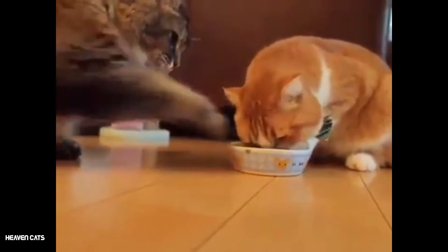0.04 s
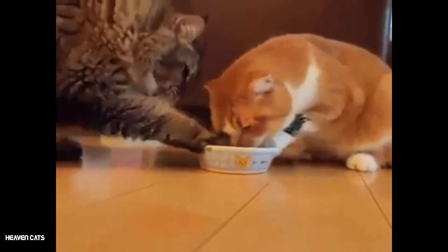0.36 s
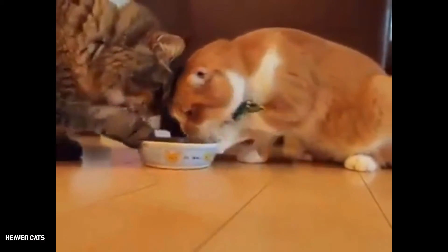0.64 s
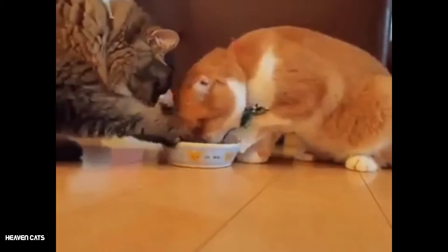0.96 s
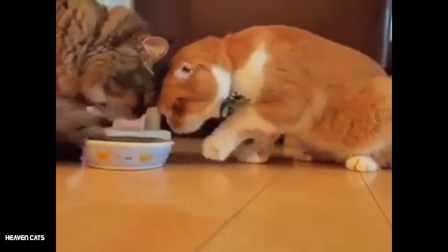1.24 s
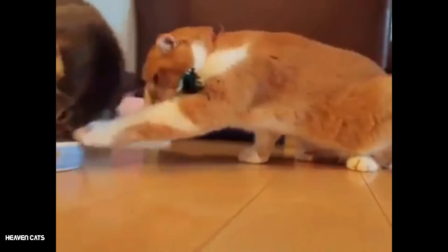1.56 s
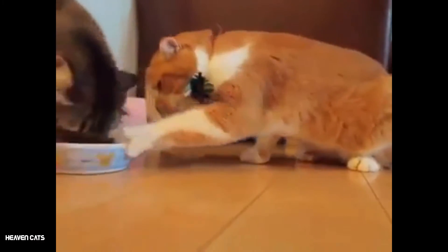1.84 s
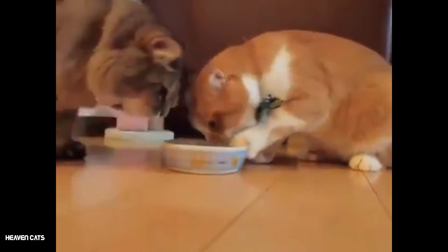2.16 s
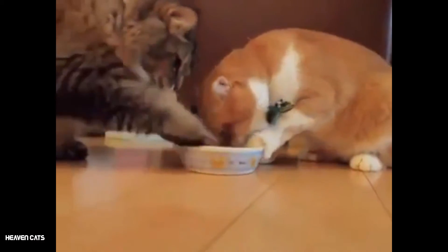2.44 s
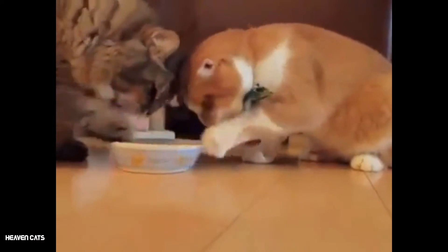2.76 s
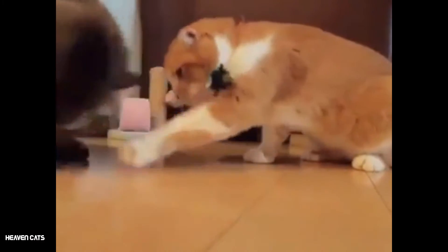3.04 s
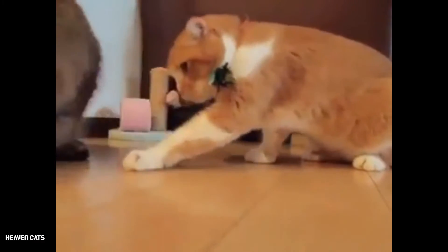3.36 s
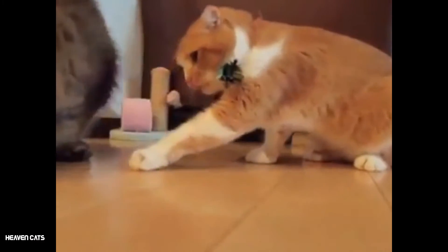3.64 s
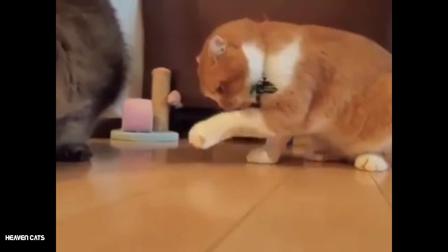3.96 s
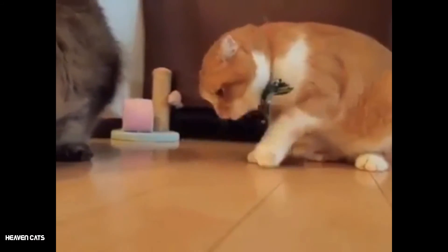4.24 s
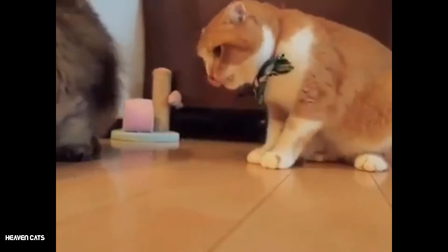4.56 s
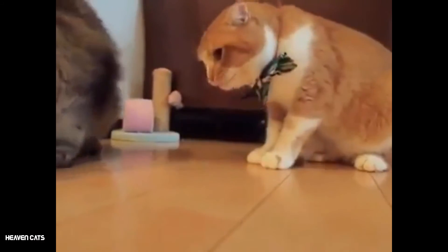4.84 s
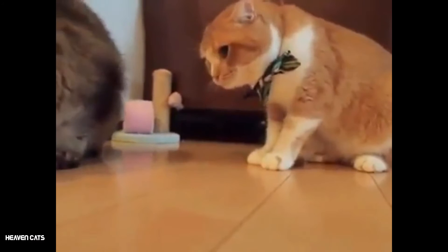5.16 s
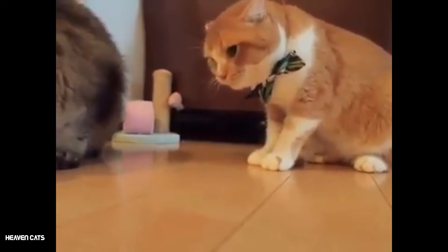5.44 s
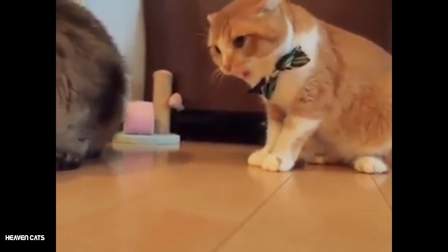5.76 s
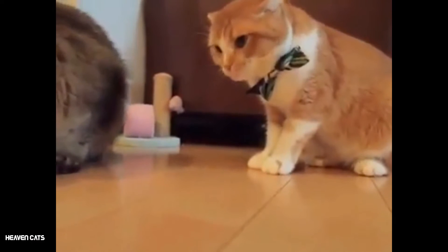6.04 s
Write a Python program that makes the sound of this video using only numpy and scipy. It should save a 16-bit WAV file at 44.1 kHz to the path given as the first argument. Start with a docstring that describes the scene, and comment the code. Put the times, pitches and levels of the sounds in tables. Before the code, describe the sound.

Cats shove a food bowl across a wooden floor with rasping, squeaky scrapes, then faint chewing and a soft double thump.

```python
"""Two cats and a food bowl

Two cats shove a bowl back and forth over a wooden floor, close by in a small room. The rim sticks
and slips: it rumbles the bowl and the boards, rasps on grit, judders, squeals and knocks. Then the
bowl rests; faint ticks of eating and a soft double thump on the floor sound over the room's hush."""
import sys
import numpy as np
from scipy import signal
from scipy.fft import rfft, irfft, next_fast_len
from scipy.io import wavfile
from scipy.ndimage import uniform_filter1d

SR = 44100
rng = np.random.default_rng(int(sys.argv[2]) if len(sys.argv) > 2 else 0)


def inscribe(sig):
    """Save sig as 16-bit PCM at rate SR to the path in sys.argv[1].

    A 1-D sig is mono; a 2-D sig holds one channel per row.
    Samples are clipped to [-1, 1] before scaling.
    """
    pcm = np.round(np.clip(np.atleast_2d(sig).T, -1, 1) * 32767)
    wavfile.write(sys.argv[1], SR, pcm.astype(np.int16))


N = 268569
T = np.arange(N) / SR

# modes of the floor and of the bowl, low to high: (frequency [Hz], width [Hz], gain [dB])
BOARD_MODES = [(92, 16, 0), (128, 34, -5), (174, 26, 3), (220, 30, -5)]
BOWL_MODES = [(280, 65, -2.5), (385, 65, 0), (480, 100, -8.5)]
RIM_MODES = [(570, 90, -2.5), (680, 90, 0), (835, 55, -7), (1060, 200, -16)]
GLAZE_MODES = [(1205, 40, -1), (1425, 45, -1), (1690, 60, 0), (1900, 90, -6), (2190, 60, 0), (2490, 60, -2),
               (2850, 75, 0), (3140, 70, -1), (3680, 110, -4), (4020, 160, -9), (4850, 260, -10)]
# grit under the rim: (frequency [Hz], gain [dB])
RASP_SPECTRUM = [(470, -8), (800, -5), (1140, -4), (1220, 0), (1510, -4.5), (1750, 0), (1940, -4.5),
                 (3080, -9), (7050, -19.5), (8350, -30), (12000, -32.5), (15600, -90), (22000, -120)]
# paw shoves: (start [s], fastest [s], end [s], rasp [dB], rumble [dB], rim chatter [dB])
SHOVES = [(.2, .35, .47, -29.5, -26, -26.5), (.198, .21, .31, -46, -39, -36),
          (0.333, 0.479, 0.55, -28, -14, -25), (0.414, .53, 0.71, -31.5, -24, -31),
          (0.673, 0.847, .925, -33.5, -21, -35), (0.944, 1.02, 1.21, -34, -21.5, -31.5),
          (1.028, 1.22, 1.438, -25.5, -18.5, -27.5), (1.275, 1.402, 1.583, -35.5, -20, -33),
          (1.683, 1.994, 2.183, -26.5, -20, -24), (2.06, 2.19, 2.33, -33, -22, -32),
          (2.24, 2.3, 2.43, -48, -34, -46), (2.505, 2.724, 2.87, -28.5, -20, -30),
          (2.686, 2.895, 3.078, -25.5, -17, -25), (2.92, 3.08, 3.255, -35.5, -24.5, -28),
          (3.13, 3.2, 3.32, -49, -35, -42)]
# friction locked onto one low mode: (start [s], end [s], frequency [Hz], level [dB])
GROANS = [(.203, .28, 745, -34), (.388, .445, 385, -14.5), (1.225, 1.265, 440, -19),
          (1.385, 1.49, 390, -17), (1.49, 1.565, 390, -28), (1.775, 1.885, 657, -27),
          (1.915, 1.955, 672, -18.5), (2.06, 2.14, 310, -22), (2.775, 2.81, 295, -21),
          (3.025, 3.205, 410, -24.5)]


def undb(db):
    """Decibels to gain."""
    return 10 ** (np.asarray(db) / 20)


def unit(x):
    """Scale to rms 1."""
    return x / (np.std(x) + 1e-12)


def peak(x, db):
    """Scale to a peak level."""
    return x * undb(db) / (np.abs(x).max() + 1e-12)


def held(x, span_s):
    """Friction feeds a vibration only up to the grip's strength: rms near 1 over each span."""
    power = np.abs(uniform_filter1d(x * x, max(int(span_s * SR), 2)))
    return x / np.sqrt(power + 1e-3 * np.var(x))


def add(out, at_s, x):
    """Mix x into out."""
    i = max(int(at_s * SR), 0)
    out[i:i + len(x)] += x[:max(N - i, 0)]


def band(x, hz, width_hz):
    """One resonance, gain 1 at its centre."""
    return signal.lfilter(*signal.iirpeak(min(hz, .45 * SR), hz / width_hz, fs=SR), x)


def narrow(x, hz, width_hz):
    """One resonance with steep skirts."""
    return band(band(x, hz, width_hz), hz, width_hz)


def between(x, lo_hz, hi_hz):
    """Steep band-pass."""
    return signal.sosfilt(signal.butter(4, [lo_hz, hi_hz], "band", fs=SR, output="sos"), x)


def colour(x, spectrum):
    """Filter by (Hz, dB) points."""
    hz, db = np.transpose(spectrum)
    size = next_fast_len(len(x))
    bins_hz = np.maximum(np.fft.rfftfreq(size, 1 / SR), 1)
    gain = undb(np.interp(np.log(bins_hz), np.log(hz), db))
    return irfft(rfft(x, size) * gain, size)[:len(x)]


def sine(hz):
    """Sine along a pitch track."""
    return np.sin(2 * np.pi * np.cumsum(hz) / SR)


def walk(rate_hz):
    """Smooth, bounded random curve, spread 1."""
    knots = np.clip(rng.standard_normal(8192), -1.6, 1.6)
    return unit(np.interp(T * rate_hz, np.arange(8192), knots))


def gate(start_s, end_s, edge_s):
    """Gate with linear edges."""
    return np.clip(np.minimum(T - start_s, end_s - T) / edge_s, 0, 1)


def slips(rate_hz, scatter_db):
    """Tiny jolts of random time, size and sign."""
    hits = rng.random(N) < rate_hz / SR
    return hits * undb(scatter_db * rng.standard_normal(N)) * rng.choice([-1, 1], N)


def rub(length_s):
    """Noisy force that swells and dies away."""
    t = T[:SR // 3]
    return rng.standard_normal(len(t)) * t * np.exp(-3 * (t / length_s) ** 2)


def crunch(length_s, rate_hz, scatter_db):
    """Short run of tiny fractures."""
    force = rub(length_s)
    hits = rng.random(len(force)) < rate_hz / SR
    return force * hits * undb(scatter_db * rng.standard_normal(len(force)))


def ring(force, modes):
    """A body's modes; neighbours swing in opposite directions."""
    return sum((-1) ** k * undb(db) * band(force, hz, width) for k, (hz, width, db) in enumerate(modes))


def roam(force, modes, spread_db=4, pitch_shift=.018, rate_hz=16, shift_rate_hz=12):
    """The contact wanders round the rim: each mode drifts in level and pitch."""
    out = np.zeros(N)
    for k, (hz, width_hz, db) in enumerate(modes):
        gain = (-1) ** k * undb(db + spread_db * walk(rate_hz))
        warped_s = T + pitch_shift / shift_rate_hz * walk(shift_rate_hz)
        out += gain * np.interp(warped_s, T, band(force, hz, width_hz))
    return out


def hush(level_db=-41.5):
    """The room's low, steady noise."""
    spectrum = [(15, -64), (25, -16.5), (74, 1.5), (109, -1), (203, 0.5), (256, -4.5), (323, -6), (349, -9),
                (451, -7.5), (861, -18), (1340, -22.5), (1680, -25), (2480, -27), (2970, -29.5),
                (12000, -46), (15600, -88), (22000, -120)]  # room noise: (frequency [Hz], gain [dB])
    waver_db = .35 * walk(9)
    return unit(colour(rng.standard_normal(N), spectrum)) * undb(level_db + waver_db)


def room(x, t60_s=.26, wet_db=-13):
    """Near walls and furniture add a short, dull tail."""
    t = T[:SR // 2]
    tail = band(rng.standard_normal(len(t)), 910, 5700) * undb(-60 * t / t60_s) * (t > .004)
    return x + undb(wet_db) * signal.fftconvolve(x, tail / np.linalg.norm(tail))[:N]


def thin_tones(rise_s=.012, jitter_hz=500):
    """Faint, thin, flickering high tones that fade quickly."""
    tones = [(2.478, -52, 5550, .07), (3.468, -53, 5460, .08), (3.864, -56, 4990, .1),
             (3.866, -51, 2422, .12), (3.868, -52, 1319, .24), (5.876, -50, 1800, .08)]  # faint tones: (time [s], peak [dB], frequency [Hz], t60 [s])
    out, t = np.zeros(N), T[:SR // 3]
    for at_s, db, hz, t60_s in tones:
        tone = sine(hz + jitter_hz * rng.standard_normal(len(t)))
        envelope = (1 - np.exp(-(t / rise_s) ** 2)) * undb(-60 * t / t60_s)
        add(out, at_s, peak(tone * envelope, db))
    return out


def high_hiss():
    """A faint, very high hiss swells and fades twice during the slide."""
    swells = [(.46, .515, -52), (2.82, 3.263, -60.5)]  # hiss swells: (start [s], end [s], level [dB])
    hiss = unit(between(slips(9000, 2.5), 8300, 12000))
    return hiss * sum(undb(db) * gate(start, end, (end - start) / 3) for start, end, db in swells)


def in_mouth(force, modes):
    """Broad, damped resonances with steep skirts."""
    return sum(undb(db) * narrow(force, hz, width_hz) for hz, width_hz, db in modes)


def chewing(rustle_db=-68, chirp_rise_s=.0111, jitter_hz=800):
    """Bites crunch over a wet rustle; kibble cracks, teeth tick, lips part with a rising chirp."""
    # resonances: (frequency [Hz], width [Hz], gain [dB])
    mouth_modes = [(1340, 460, -6), (2430, 490, -1.5), (3800, 1900, -22.5)]
    kibble_modes = [(1310, 380, 5), (2230, 340, 2), (3830, 580, -16)]
    # food breaking: (time [s], peak [dB], length [s])
    bites = [(4.08, -48, .11), (4.205, -41, 0.024), (4.556, -39.5, 0.018), (4.638, -44, .02),
             (4.745, -35.5, 0.008), (4.898, -40.5, 0.03), (4.988, -35.5, 0.05), (5.245, -36, 0.02),
             (5.313, -44, 0.14), (5.487, -46, 0.02)]
    cracks = [(5.019, -28.5, 0.022)]
    ticks = [(5.118, -47), (5.478, -44), (5.503, -49)]  # tooth contacts: (time [s], peak [dB])
    smacks = [(3.485, -45, 2550), (3.912, -49, 1360), (4.34, -46, 2550)]  # wet lips: (time [s], peak [dB], final pitch [Hz])
    t = T[:SR // 3]
    rustle = unit(in_mouth(slips(700, 4.6), mouth_modes))
    out = rustle * gate(4.1, 5.9, .49) * undb(rustle_db + 5.5 * walk(14))
    for at_s, db, length_s in bites:
        add(out, at_s, peak(in_mouth(crunch(length_s, 8000, 1), mouth_modes), db))
    for at_s, db, length_s in cracks:
        add(out, at_s, peak(in_mouth(crunch(length_s, 2500, 2), kibble_modes), db))
    for at_s, db in ticks:
        add(out, at_s, peak(narrow(rub(.011), hz=3500, width_hz=1000), db))
    for at_s, db, hz in smacks:
        glide_hz = hz * (1 - .33 * np.exp(-t / chirp_rise_s))
        chirp = sine(glide_hz + jitter_hz * rng.standard_normal(len(t)))
        envelope = uniform_filter1d(np.abs(rub(.034)), 40)
        add(out, at_s, peak(chirp * envelope, db))
    return out


def paws(click_s=.0015):
    """Pads shuffle on the boards; claws click on something hard."""
    shuffles = [(5.912, -37, 0.12), (6.012, -36, 0.014)]  # pad rubs: (time [s], peak [dB], length [s])
    clicks = [(1.628, -32), (3.691, -30.5)]  # claw hits: (time [s], peak [dB])
    click_spectrum = [(500, -14), (1200, -8), (3300, -4), (6500, -14), (8000, -18), (12000, -34)]  # claw hit: (frequency [Hz], gain [dB])
    out, t = np.zeros(N), T[:SR // 3]
    for at_s, db, length_s in shuffles:
        add(out, at_s, peak(narrow(rub(length_s), hz=655, width_hz=490), db))
    for at_s, db in clicks:
        snap = rng.standard_normal(len(t)) * t * np.exp(-t / click_s)
        add(out, at_s, peak(colour(snap, click_spectrum), db))
    return out


def thumps(rebound_s=.00498, rebound_db=-2, boom_hz=87, boom_s=.038, rise_s=.0032):
    """Each padded blow lands in two steps and presses the floor into a short, deep boom."""
    blows = [(5.7426, -18.5, -20), (5.792, -16.5, -17)]  # floor hits: (time [s], knock peak [dB], boom peak [dB])
    modes = [(145, 53, 26), (366, 28, 3), (690, 66, -15), (1090, 110, 0)]  # struck floor: (frequency [Hz], width [Hz], gain [dB])
    out, t = np.zeros(N), T[:SR // 3]
    impulse = signal.unit_impulse(len(t))
    knock = between(sum(undb(db) * band(impulse, hz, width) for hz, width, db in modes), 50, 1150)
    rebound = between(knock, 40, 700)
    envelope = (1 - np.exp(-t / rise_s)) * np.exp(-(t / boom_s) ** 2)
    boom = -np.sin(2 * np.pi * boom_hz * t) * envelope
    for at_s, knock_db, boom_db in blows:
        add(out, at_s, peak(knock, knock_db) + peak(boom, boom_db))
        add(out, at_s + rebound_s, peak(rebound, knock_db + rebound_db))
    return out


def singing(start_s=2.85, end_s=3.18, rise_s=.02, sag_db_per_s=35, release_s=.34, wander_hz=17):
    """In the last shoves the rim sings like a rubbed glass, then rings out."""
    partials = [(2358, -32), (2445, -42), (4985, -46)]  # rubbed rim: (frequency [Hz], level [dB])
    sag_db = sag_db_per_s * np.maximum(T - start_s, 0)
    release_db = 60 * np.maximum(T - end_s, 0) / release_s
    envelope = np.clip((T - start_s) / rise_s, 0, 1) * undb(-sag_db - release_db)
    drift_hz = wander_hz * walk(120)
    return envelope * sum(sine(hz + drift_hz) * undb(db + 3.2 * walk(90)) for hz, db in partials)


def catches(dust_db=-3):
    """Coarse specks, crushed under the rim, crackle and ring the bowl's high modes."""
    specks = [(.389, -15.5, 0.017), (1.206, -21, 0.014), (1.988, -19, .014), (2.095, -21, 0.014),
              (2.719, -18, .012), (3.028, -21, .014)]  # crushed specks: (time [s], peak [dB], length [s])
    out = np.zeros(N)
    for at_s, db, length_s in specks:
        force = crunch(length_s, 2500, 2)
        crackle = unit(ring(force, GLAZE_MODES)) + undb(dust_db) * unit(colour(force, RASP_SPECTRUM))
        add(out, at_s, peak(between(crackle, 700, 7000), db))
    return out


def screeches(sag_db_per_s=42.5, edge_s=.05, flutter_db=2.4):
    """Grit plucks the high modes; where the rim bites, one group sings out and fades as it eases off."""
    # rim bites: (start [s], end [s], centre [Hz], width [Hz], level [dB])
    bites = [(.215, .33, 2900, 1400, -36), (1.14, 1.24, 4600, 1800, -34), (.315, .42, 3000, 1300, -26),
             (.30, .52, 1750, 550, -29), (.43, .62, 3000, 1300, -31), (1.16, 1.33, 2900, 1100, -26),
             (1.22, 1.40, 1230, 300, -34), (1.39, 1.50, 2500, 300, -34), (1.87, 2.03, 1650, 250, -32),
             (1.91, 2.04, 2750, 1100, -25.5), (2.65, 2.82, 2950, 450, -33), (2.87, 2.99, 1660, 130, -31),
             (2.96, 3.20, 1270, 550, -27.5)]
    out, t = np.zeros(N), T[:SR // 2]
    grains = roam(slips(4000, 2), GLAZE_MODES)
    for start_s, end_s, hz, width_hz, db in bites:
        squeal = held(narrow(grains[int(start_s * SR):][:len(t)], hz, width_hz), .061)
        fade = np.clip(np.minimum(t, end_s - start_s - t) / edge_s, 0, 1)
        add(out, start_s, squeal * undb(db - sag_db_per_s * t) * fade)
    return out * undb(flutter_db * walk(110))


def groans(wander_hz=20, flutter_db=3):
    """One mode, kept going by friction, wavers in pitch and level."""
    drift_hz = wander_hz * walk(130)
    force = undb(flutter_db * walk(90))
    return sum(unit(sine(hz + drift_hz) * force) * undb(db) * gate(start_s, end_s, .0058)
               for start_s, end_s, hz, db in GROANS)


def judders(wobble=.025, uneven_db=3.5, bowl_db=-4, rim_db=-15):
    """Slips fall into step and buzz through boards and bowl."""
    runs = [(1.04, 1.17, 174, -24), (1.245, 1.39, 175, -22), (1.697, 1.755, 208, -23),
            (1.766, 1.81, 200, -18), (1.83, 1.885, 187, -18), (2.585, 2.70, 172, -22)]  # regular slipping: (start [s], end [s], slip rate [Hz], level [dB])
    out = np.zeros(N)
    drift = 1 + wobble * walk(60)
    force = undb(uneven_db * walk(130))
    for start_s, end_s, hz, db in runs:
        pulses = np.diff(np.floor(np.cumsum(hz * drift) / SR), prepend=0) * force
        buzz = ring(pulses, BOARD_MODES) + undb(bowl_db) * ring(pulses, BOWL_MODES)
        buzz += undb(rim_db) * ring(pulses, RIM_MODES)
        out += held(between(buzz, 140, 910), .013) * undb(db) * gate(start_s, end_s, .003)
    return out


def presses(half_length_s=.033, width_hz=33.6):
    """Under a cat's weight the sliding rim briefly drives one low resonance of the boards."""
    loads = [(.29, -28.5, 225), (0.389, -22, 180), (.68, -27.5, 195), (.54, -29, 97), (0.549, -19.5, 161),
             (.87, -23.5, 176.5), (1.224, -17, 98), (1.279, -24, 169), (2.03, -29, 100), (2.135, -21.5, 93),
             (2.139, -20.5, 155), (2.47, -38.5, 105), (2.509, -36, 189), (2.82, -20.5, 163),
             (2.84, -29, 101), (2.90, -26, 105), (2.954, -18.5, 171)]  # weight bearing down: (centre time [s], level [dB], frequency [Hz])
    out, t = np.zeros(N), T[:SR // 2] - T[SR // 4]
    envelope = np.exp(-(t / half_length_s) ** 2)
    for at_s, db, hz in loads:
        force = between(rng.standard_normal(len(t)), 78, 260)
        boom = held(narrow(force, hz, width_hz), .042)
        add(out, at_s + t[0], boom * undb(db) * envelope)
    return out


def knocks(pitch_spread=.018, boards_db=-11):
    """The caught rim drops back, each time on another spot, which detunes the modes."""
    drops = [(.204, -26, 10), (.389, -2, -3), (.399, -7, 1), (.412, -10, -8), (.489, -8, -8),
             (.500, -5, -8), (.551, -14, -8), (.649, -12, -18), (.757, -16, -12), (.789, -11, -12),
             (1.012, -13, -8), (1.117, -15, -9), (1.148, -14, -9), (1.207, -10, 3), (1.230, -11, -6),
             (1.246, -9, -6), (1.389, -17, -10), (1.438, -14, -10), (1.535, -18, -12), (1.647, -29, -10),
             (1.698, -18, -14), (1.731, -16, -3), (1.787, -12, -10), (1.836, -14, -9), (1.855, -12, -4),
             (2.104, -7, 1), (2.108, -4, 1), (2.236, -19, -9), (2.462, -29, -12), (2.541, -31, 0),
             (2.567, -22, 2), (2.684, -8, -10), (2.722, -15, 8), (2.778, -12, -13), (2.796, -10, -8),
             (2.845, -7, -10), (2.948, -4, 0)]  # rim impacts: (time [s], peak [dB], rim mode gain [dB])
    out = np.zeros(N)
    blow = between(signal.unit_impulse(SR // 3), 187, 1210)
    boards = undb(boards_db) * ring(blow, BOARD_MODES)
    for at_s, db, rim_db in drops:
        bowl, rim = (ring(blow, np.array(modes) * [1 + pitch_spread * rng.standard_normal(), 1, 1])
                     for modes in (BOWL_MODES, RIM_MODES))
        add(out, at_s, peak(bowl + undb(rim_db) * rim + boards, db))
    return out


def shoved(levels_db, exponent, ring_on_s=.007):
    """Envelope: a power of the bowl's speed, one arch per shove; the vibration outlasts the motion."""
    power = np.zeros(N)
    for (start_s, fastest_s, end_s, *_), db in zip(SHOVES, levels_db):
        speed = np.sin(np.pi / 2 * np.interp(start_s + T[:SR], [start_s, fastest_s, end_s], [0, 1, 0]))
        add(power, start_s, (undb(db) * speed ** exponent) ** 2)
    pole = np.exp(-2 / (ring_on_s * SR))
    return np.sqrt(signal.lfilter([1 - pole], [1, -pole], power + 1e-18))


def locking(dip_db=-.5):
    """Gain of the loose rumble, which gives way while one mode groans."""
    groaning = sum(gate(start_s, end_s, .023) for start_s, end_s, *_ in GROANS)
    return undb(dip_db * np.minimum(groaning, 1))


def slide(boards_db=-11, grit_db=-4.5, glaze_db=-4.5, rough_db=.5, flutter_db=1.5):
    """The dragged rim jolts bowl and boards; grit under it rasps in the same uneven grip."""
    rasp_db, rumble_db, chatter_db = np.transpose(SHOVES)[3:]
    grip = undb(rough_db * walk(150))
    jolts = slips(1400, 2.53) * grip
    bowl = held(between(roam(jolts, BOWL_MODES), 215, 680), .035) * locking()
    boards = held(between(ring(jolts, BOARD_MODES), 76, 270), .06) * undb(boards_db)
    rim = held(between(roam(jolts, RIM_MODES), 500, 1250), .03)
    # fine grit hisses; coarser specks ring the high modes
    grit = unit(colour(slips(9000, 3.4) * grip, RASP_SPECTRUM)) * undb(grit_db)
    specks = slips(1300, 3.8) * grip
    glaze = held(between(roam(specks, GLAZE_MODES), 690, 6500), .057) * undb(glaze_db)
    rumble = (bowl + boards) * shoved(rumble_db, .93) + rim * shoved(chatter_db, 1)
    rasp = grit * shoved(rasp_db, 1.35) + glaze * shoved(rasp_db, 2.74)
    return rumble + rasp * undb(flutter_db * walk(60))


def scene():
    """Bowl, cats and room, mono."""
    sliding = slide() + presses() + judders() + groans() + screeches()
    sliding += singing() + high_hiss() + catches() + knocks()
    return (room(sliding + thumps() + paws()) + chewing() + thin_tones() + hush())[None]


def record(dry, ceiling=.97, cutoff_hz=12200):
    """Soft peak limit, then a steep low-pass."""
    rounded = dry / (1 + (dry / ceiling) ** 6) ** (1 / 6)
    return signal.sosfilt(signal.ellip(10, .2, 70, cutoff_hz, fs=SR, output="sos"), rounded)


dry = scene()
out = record(dry)
inscribe(out)
```